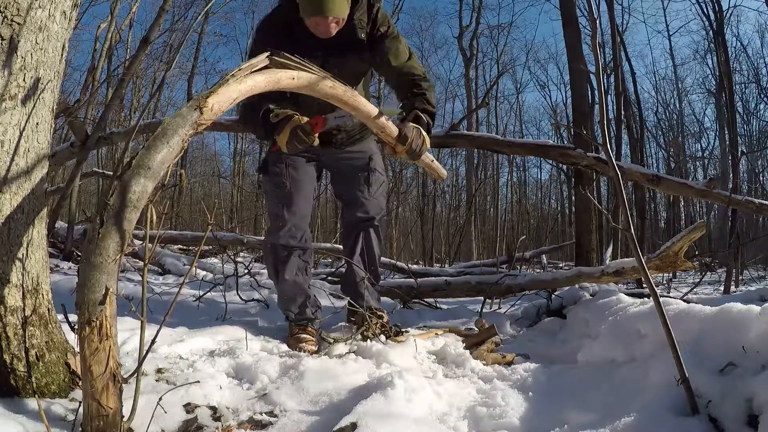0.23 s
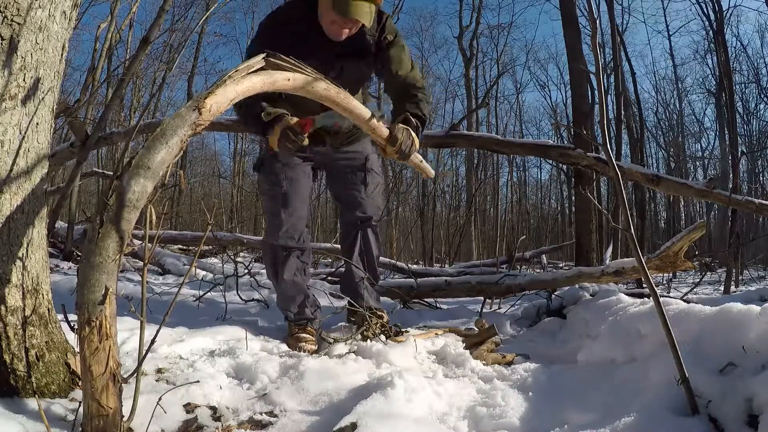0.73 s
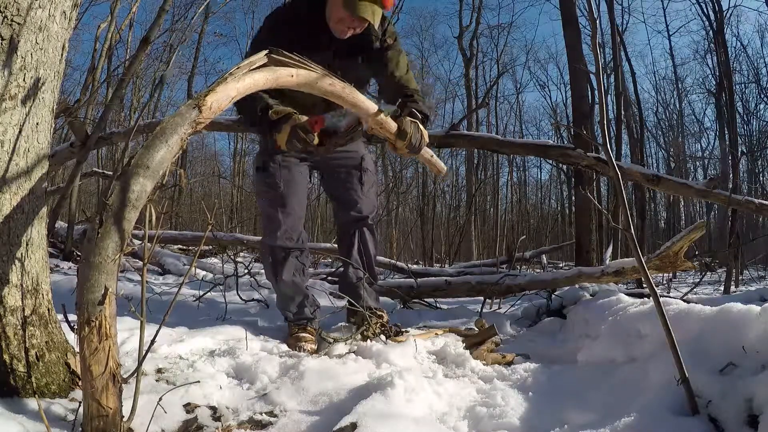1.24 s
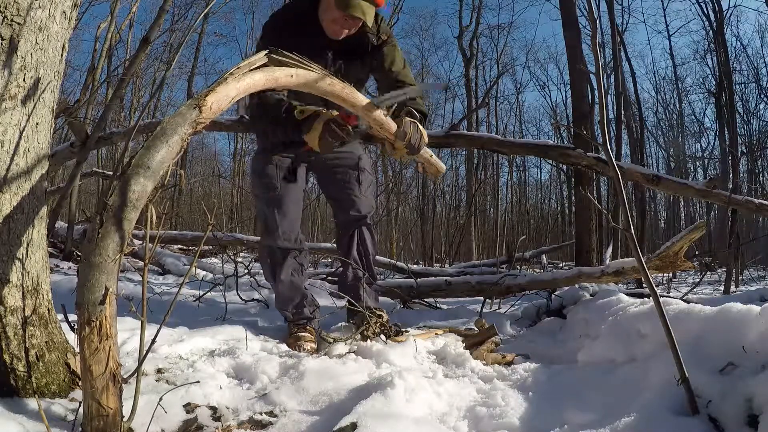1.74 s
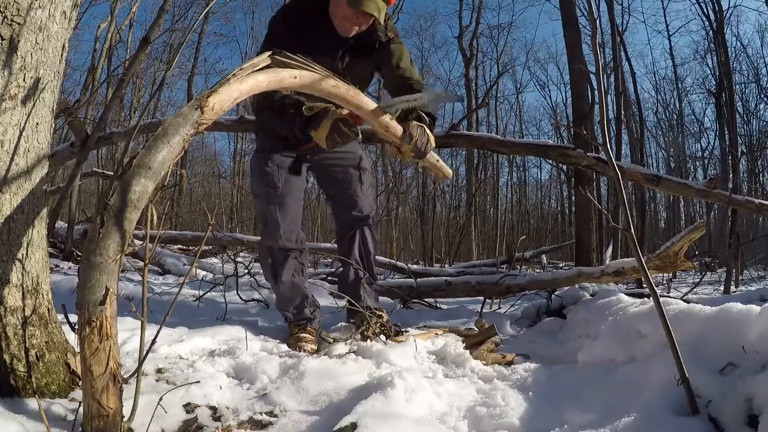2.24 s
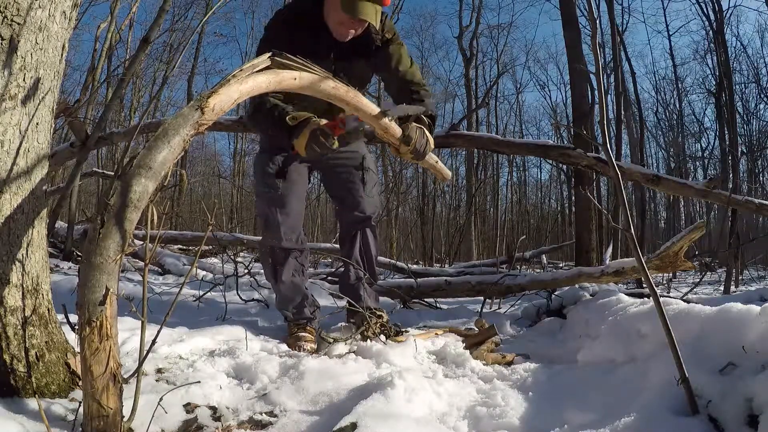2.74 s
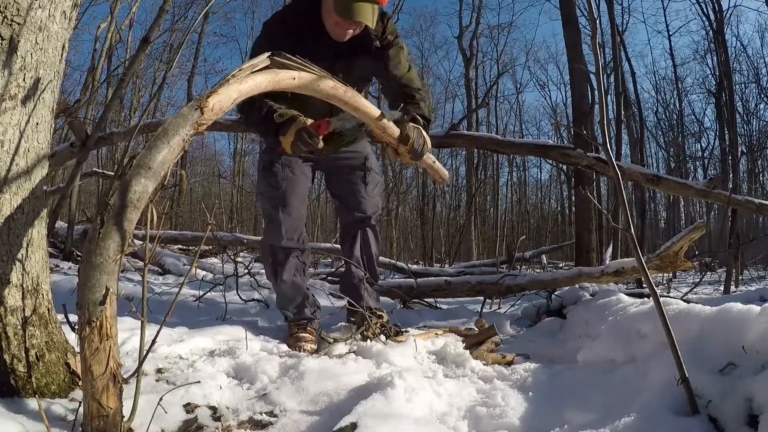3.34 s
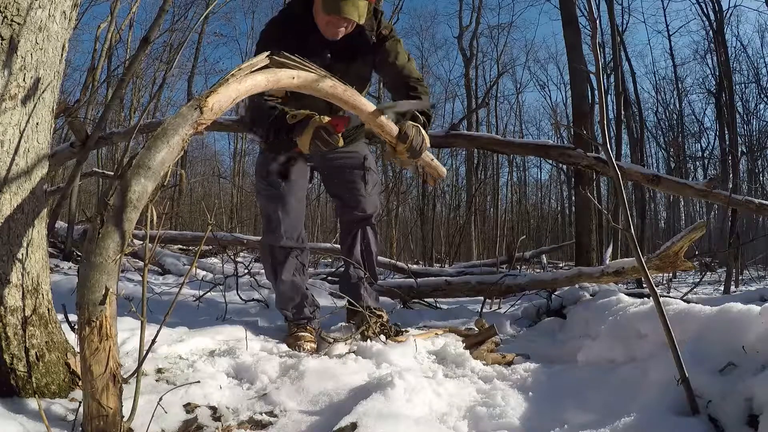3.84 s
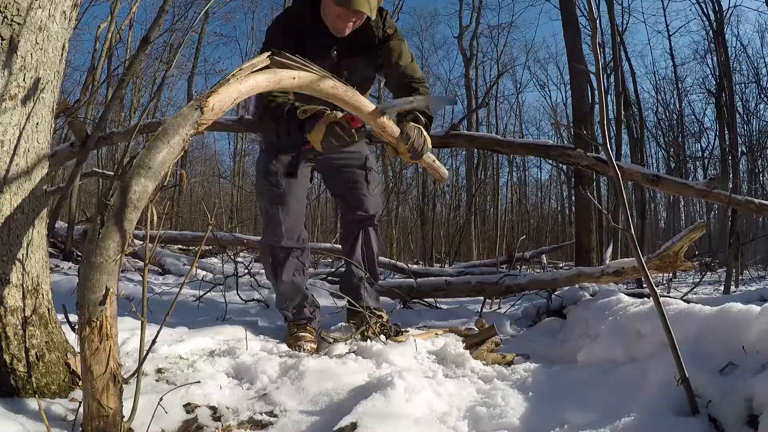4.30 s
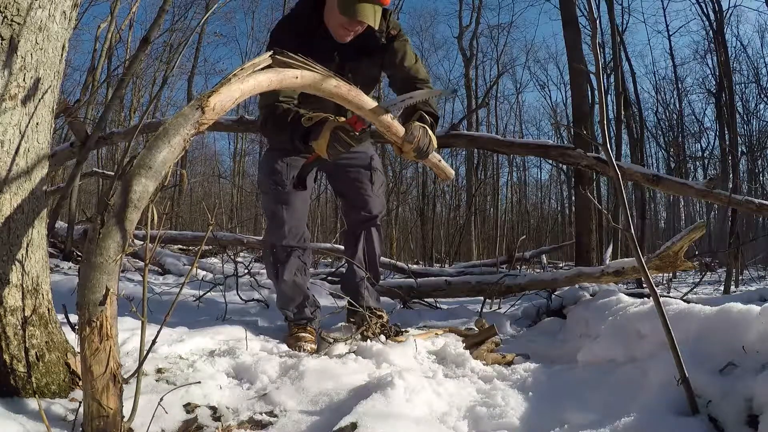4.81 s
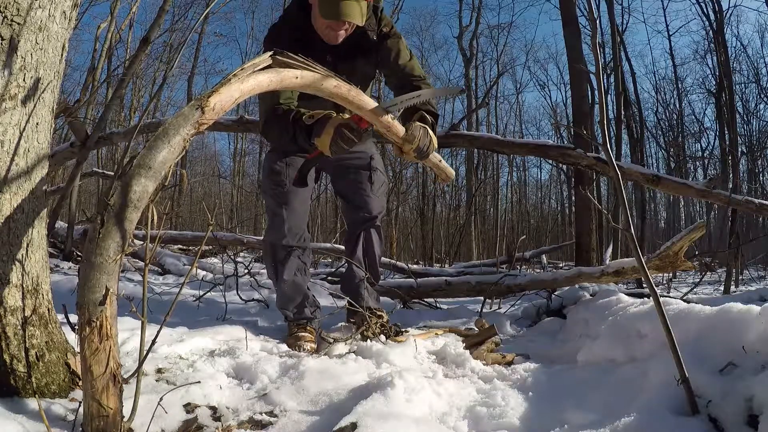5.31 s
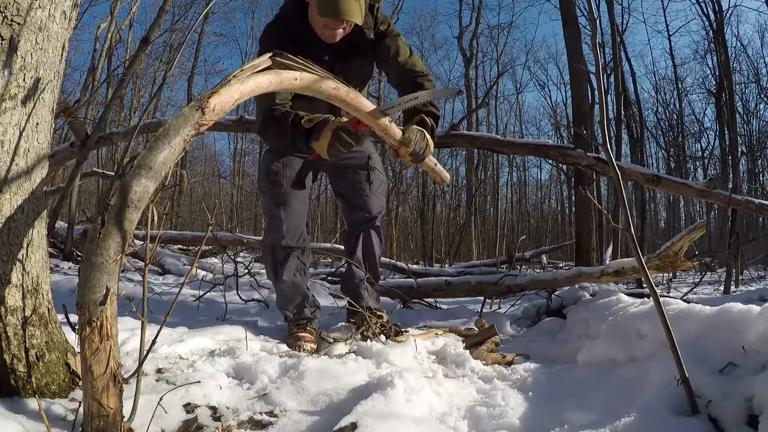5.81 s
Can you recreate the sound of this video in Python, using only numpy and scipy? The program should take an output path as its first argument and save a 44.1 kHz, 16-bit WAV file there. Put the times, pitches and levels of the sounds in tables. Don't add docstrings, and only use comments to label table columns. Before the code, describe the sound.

Brisk sawing of dry wood outdoors, coarse pulls alternating with finer pushes, with small branch shudders, ticks and a few blade squeals late on.

```python
import sys
import numpy as np
from scipy import signal
from scipy.fft import rfft, irfft
from scipy.io import wavfile
from scipy.ndimage import uniform_filter1d

SR = 44100
rng = np.random.default_rng(int(sys.argv[2]) if len(sys.argv) > 2 else 0)


def dump(signal):
    limited = np.clip(np.atleast_2d(signal).T, -1, 1)
    pcm = np.round(limited * 32767).astype(np.int16)
    wavfile.write(sys.argv[1], SR, pcm)


def field_ratio(decibels):
    return 10 ** (np.asarray(decibels, dtype=float) / 20)


N = 267246
T = np.arange(N) / SR


def evened(x):
    return x / np.sqrt(np.mean(x ** 2) + 1e-20)


def levelled(x, size):
    return x / np.sqrt(abs(uniform_filter1d(x ** 2, size)) + 1e-12)


def coloured(x, points, lo_hz=20, hi_hz=20000):
    hz = abs(np.fft.fftfreq(8192, 1 / SR)) + 1
    point_hz, point_db = np.transpose(points)
    edges = np.sqrt((1 + (lo_hz / hz) ** 8) * (1 + (hz / hi_hz) ** 8))
    gain = field_ratio(np.interp(np.log(hz), np.log(point_hz), point_db)) / edges
    log_gain = np.log(np.maximum(gain, 1e-5))
    taps = np.fft.ifft(np.exp(np.conj(signal.hilbert(log_gain)))).real[:4096]
    return evened(signal.oaconvolve(x, taps)[:N])


def resonate(x, hz, width):
    turn = np.exp(2j * np.pi * np.cumsum(hz * np.ones(N)) / SR)
    r = np.exp(-np.pi * width / SR)
    return 2 * (turn * signal.lfilter([1 - r], [1, -r], x / turn)).real


def wander(top_hz):
    low_pass = signal.butter(2, top_hz, fs=SR, output="sos")
    return evened(signal.sosfilt(low_pass, rng.standard_normal(N)))


def clicks(events):
    out = np.zeros(N)
    s, db = np.transpose(events)
    out[np.minimum(np.round(s * SR).astype(int), N - 1)] = field_ratio(db)
    return out


def bumps(events, width_s):
    return sum(field_ratio(db) * np.exp(-.5 * ((T - s) / width_s) ** 2) for s, db in events)


def saw():
    bite, hiss, rumble, shake, index, place = strokes()
    pull = index % 2 == 1
    buzz = tooth_buzz(pull, index, place)
    caught = catches()
    jolts = fibres(buzz, caught, np.where(pull, 1.25, .65))
    scrape = fibres(buzz, caught, np.where(pull, .65, .4))
    rings = sharp_rings(jolts, scrape, pull, index, place)
    flat = [(20, 0), (20000, 0)]
    wood = evened(stroke_colour(jolts, pull, 766, 3560) + 0.79 * coloured(rings, flat, 460, 3150))
    blade = evened(stroke_colour(scrape, pull, 3700, 20000) + .7 * coloured(rings, flat, 3800, 20000))
    tooth_thump = np.where(pull, .6, 3.2) * buzz * ((1 + place) / 2) ** 1.5 * field_ratio(2 * wander(25))
    thump = stroke_colour(scrape, pull, 120, 750) + tooth_thump
    swing = levelled(resonate(evened(caught * bite) + 1.65 * jolts, 75, 16), size=900)
    cut = bite * wood + hiss * field_ratio(1.74 * wander(28)) * blade
    cut = cut + rumble * levelled(thump, size=2500) + shake * swing
    return cut + squeaks() + rasps()


# start_s, length_s, peak_bite_db, lateness of the peak [1 = middle], mid_stroke_teeth_per_s
PUSHES = [(-0.15, 0.21, -24.5, 0.91, 150), (0.335, 0.18, -30.5, 0.98, 175), (0.747, 0.18, -30, 1.42, 165),
          (1.176, 0.16, -28.5, 1.22, 181), (1.581, 0.18, -30.5, 1.21, 157), (2.019, 0.14, -29, 2.02, 166),
          (2.405, 0.2, -32, 1.39, 181), (2.842, 0.17, -30.5, 1.88, 210), (3.274, 0.19, -32, 1.29, 161),
          (3.725, 0.18, -31, 1.15, 215), (4.151, 0.18, -31.5, 1.326, 230), (4.6, 0.23, -32, 1.16, 132),
          (5.065, 0.23, -33, 1.23, 146), (5.532, 0.21, -31, 1.27, 179), (6.004, 0.15, -33.5, 0.95, 180)]
# start_s, length_s, peak_bite_db, lateness of the peak [1 = middle], blade_hiss_db over the bite
PULLS = [(0.069, 0.22, -28, 1.264, -4), (0.525, 0.19, -28, 1.014, -2.5), (0.952, 0.2, -30.5, 1.49, 0.5),
         (1.374, 0.18, -27.5, 1.26, -4.5), (1.763, 0.197, -31.5, 1.5, -3), (2.179, 0.21, -27.5, 1.69, -3.5),
         (2.629, 0.18, -30.5, 1.36, -2.5), (3.075, 0.17, -30.5, 1.29, -2), (3.505, 0.17, -29.5, 1.23, -2),
         (3.922, 0.17, -28.5, 1.3, -2.5), (4.349, 0.2, -30, 1.61, -1.5), (4.873, 0.16, -30, 1.2, -4),
         (5.329, 0.19, -27.5, 1.3, -0.5), (5.774, 0.17, -29, 1.33, 1)]
# middle_s, level_db
SHAKES = [(0.04, -46.5), (0.21, -43), (0.44, -48.5), (0.65, -47), (1.101, -49), (1.28, -54), (1.5, -55),
          (1.9, -44), (2.341, -48), (2.75, -43), (3.189, -39), (3.421, -47.5), (3.62, -42), (4.039, -46),
          (4.501, -42), (4.791, -53), (4.979, -49.5), (5.469, -56), (5.661, -46), (5.9, -46.5)]


def strokes():
    table = np.array(sorted(PUSHES + PULLS))
    index = np.maximum(np.searchsorted(table[:, 0], T) - 1, 0)
    start, length, peak_db, lateness, last = table[index].T
    pull = index % 2 == 1
    pointedness = np.where(pull, 1.57, 1.455) + 11.1 * (length - 0.19)
    done = np.clip((T - start) / length, 0, 1)
    travel = done ** lateness
    speed = abs(np.sin(np.pi * travel))
    bite = field_ratio(peak_db) * speed ** (pointedness * np.where(travel > .5, 0.89, 1))
    stop_s, release_s = 0.004, 0.031
    bite = bite * np.clip((start + length - stop_s - T) / release_s, 0, 1)
    late = np.clip(2.5 * done - .75, -.3, 1.4)
    hiss_db = np.where(pull, last - .4 * (late - .5), -5.5 - 2.5 * (late - .5))
    rumble_db = np.where(pull, -19 + 8 * late, -17.5 + 7.5 * late)
    sing = (bite / field_ratio(peak_db)) ** np.where(pull, 0.3, 0.21)
    return bite, bite * sing * field_ratio(hiss_db), bite * field_ratio(rumble_db), bumps(SHAKES, 0.04), index, 2 * travel - 1


def tooth_buzz(pull, index, place):
    pushing_hz = np.array(PUSHES)[index // 2, -1] * (1.03 - .42 * np.maximum(place + .15, 0) ** 2)
    pulling_hz = 270 * np.sqrt(1 - 0.76 * place ** 2)
    hz = np.where(pull, pulling_hz, pushing_hz) * (1 + wander(40) / 70)
    turn = 2 * np.pi * np.cumsum(hz) / SR
    overtones = sum(np.cos(k * turn) * 1.6 / np.sqrt(k) for k in range(2, 7))
    return np.cos(turn) + ~pull * overtones


# middle_s, level_db over the bite
CATCHES = [(0.169, 3), (0.194, 6), (0.355, 6), (0.406, 5), (0.641, 9), (0.796, 9), (1.057, 5), (1.207, 5),
           (1.258, 4), (1.468, 6), (1.613, 6), (1.689, 5), (1.838, 5), (2.277, 5), (2.703, 7), (2.763, 7),
           (2.892, 8), (3.114, 5), (3.142, 5), (3.384, 6), (3.541, 8), (3.571, 7), (3.753, 8), (3.976, 6),
           (4.253, 7), (4.645, 11), (4.918, 5), (5.418, 4), (5.582, 7), (5.822, 4)]


def catches():
    gap_s, jitter_s, push_misses = .0138, .001, .55
    level_db, spread_db = 4, 1.5
    starts = np.transpose(sorted(PUSHES + PULLS))[0]
    restarts = np.sort(np.r_[np.transpose(CATCHES)[0], np.maximum(starts + .03, 0), N / SR])
    luck = rng.standard_normal((len(restarts), 16, 2))
    missed = rng.random((len(restarts), 16)) < push_misses
    at = restarts[:, None] + np.cumsum(gap_s + jitter_s * luck[..., 0], axis=1)
    pushing = (np.searchsorted(starts, at) - 1) % 2 == 0
    in_time = at < np.r_[restarts[1:], 0][:, None] - gap_s / 2
    kept = in_time & ~(missed & pushing)
    shudder_db = np.minimum(np.interp(at[kept], *np.transpose(SHAKES)) + 43, 0)
    chatter_db = level_db + .55 * shudder_db + spread_db * luck[..., 1][kept]
    return clicks(np.r_[CATCHES, np.c_[at[kept], chatter_db]])


def fibres(teeth, caught, catch):
    t = np.arange(-300, 301) / SR
    burst = signal.oaconvolve(caught, np.exp(-.5 * (t / .0026) ** 2), "same")
    gate = (1 + 0.11 * teeth) * field_ratio(0.63 * wander(280))
    sizes = rng.standard_normal(N) * field_ratio(0.88 * rng.exponential(1, N))
    snaps = sizes * (rng.random(N) < 25000 / SR)
    return evened(snaps) * (gate + catch * burst)


# pitch_hz, level_db per Hz
PULL = [(71, 6.5), (120, -27), (287, -9), (389, -26), (792, -12), (950, -19), (1450, -1.5), (2470, -19.5),
        (2840, -13), (6020, -24), (8160, -16), (9600, -32), (13000, -21.5), (15300, -33)]
# pitch_hz, level_db per Hz
PUSH = [(71, -27), (120, -34), (173, 8), (244, -2.5), (405, 8), (931, -13.5), (1450, 2.5), (1610, -6.5),
        (2520, -13), (2840, -9.5), (3850, -11), (8160, -7), (9600, -16), (15300, -9)]


def stroke_colour(drive, pull, lo_hz, hi_hz):
    pulled = evened(pull * coloured(drive, PULL, lo_hz, hi_hz))
    pushed = evened(~pull * coloured(drive, PUSH, lo_hz, hi_hz))
    return np.where(pull, pulled, pushed)


# pitch_hz, width_hz, level_db
RINGS = [(1350, 51, -52), (1477, 23, -7), (1673, 110, -17.5), (1985, 280, -17.5), (2816, 200, -10),
         (3300, 57, -15.5), (4190, 130, -17.5), (5070, 69, -15.5), (7000, 140, -10.5), (7600, 150, -6.5),
         (8250, 96, -5), (12850, 100, -48)]


def sharp_rings(jolts, scrape, pull, index, place):
    chance = rng.standard_normal((len(PUSHES + PULLS), len(RINGS), 2))
    rings = np.zeros(N)
    for k, (hz, width, db) in enumerate(RINGS):
        pitch = hz * (1 + 0.0254 * (chance[index, k, 0] + place * np.where(pull, 1, -1)))
        swell_db = 2 * chance[index, k, 1] + 3.5 * wander(25)
        drive = jolts if hz < 3800 else scrape
        rings += field_ratio(db + swell_db) * evened(resonate(drive, pitch, width))
    return rings


# start_s, length_s, first_pitch_hz, last_pitch_hz, level_db
SQUEAKS = [
    (.69, .035, 3320, 3300, -56),
    (1.926, .026, 4060, 3850, -38),
    (4.072, .05, 2020, 1970, -52),
]


def squeaks():
    out, waver, rough = np.zeros(N), wander(291), field_ratio(2 * wander(241.8))
    for s, length, first_hz, last_hz, db in SQUEAKS:
        over_db = 2 * (db + 35)
        u = np.clip((T - s) / length, 0, 1)
        hz = (first_hz + (last_hz - first_hz) * u) * (1 + waver / 120)
        turn = 2 * np.pi * np.cumsum(hz) / SR
        overtones = np.sin(2 * turn) + 0.23 * np.sin(3 * turn)
        out += field_ratio(db) * np.sin(np.pi * u) * (np.sin(turn) + field_ratio(over_db) * overtones)
    return out * rough


# start_s, length_s, first_pitch_hz, last_pitch_hz, level_db
RASPS = [(2.328, 0.027, 4040, 4030, -36.5), (2.486, 0.042, 4350, 4090, -40),
         (2.761, 0.036, 3380, 3300, -47), (3.188, 0.026, 5550, 5500, -37), (4.689, .04, 4970, 4180, -42),
         (5.157, 0.052, 3820, 3300, -34.5), (5.163, 0.018, 5260, 4750, -37.5),
         (5.159, 0.041, 1976, 1900, -33.5), (5.625, 0.042, 4746, 4190, -31), (5.628, .035, 7025, 7070, -33),
         (5.639, 0.039, 2918, 2800, -32)]


def rasps():
    out, noise = np.zeros(N), rng.standard_normal(N)
    for s, length, first_hz, last_hz, db in RASPS:
        width = 110 + .2 * (first_hz - last_hz)
        u = np.clip((T - s) / length, 0, 1)
        squeal = evened(resonate(noise, first_hz + (last_hz - first_hz) * u, width))
        out += field_ratio(db) * np.sin(np.pi * u) * squeal
    return out


def trunks(x):
    t = np.arange(SR // 4) / SR
    echoes = rng.choice([-1., 1.], len(t)) * (rng.random(len(t)) < 2000 / SR)
    tail = echoes * field_ratio(-60 * t / 0.017) * (t > .004)
    return signal.oaconvolve(x, tail / np.linalg.norm(tail))[:N]


# start_s, peak_db
TICKS = [
    (0.2973, -34),
    (1.34, -36),
    (1.376, -50),
    (1.5963, -49),
    (2.2, -53),
    (3.704, -78),
    (3.929, -45),
]
# middle_s, level_db
RUSTLE = [(.064, -79), (.317, -65), (.51, -61), (1.76, -62), (2.174, -63), (2.396, -67), (3.04, -60),
          (3.259, -70), (3.496, -54), (5.049, -59), (5.31, -59.5), (5.514, -52.5), (5.751, -64.5),
          (5.985, -66)]
# pitch_hz, level_db per Hz
QUIET = [(18, -28), (30, 2), (53, -40.5), (525, -2), (1460, -5.5), (2410, -15), (2820, -12.5),
         (5880, -16.5), (8280, -16), (13600, -35), (16000, -49)]


def woods():
    still = coloured(rng.standard_normal(N) * field_ratio(2 * wander(66)), QUIET, 270, 18000)
    moving = coloured(still, [(20, 3), (20000, 2)], 195, 6900) * bumps(RUSTLE, 0.099)
    rustle = field_ratio(-63) * still + field_ratio(-1) * moving
    t = np.arange(300) / SR
    tick_shape = rng.standard_normal(len(t)) * np.exp(-t / 0.0013)
    ticks = signal.oaconvolve(clicks(TICKS), tick_shape)[:N]
    hum = field_ratio(-58.5) * coloured(rng.standard_normal(N), QUIET, 52, 110)
    pressure = signal.lfilter(*signal.butter(2, 12, fs=SR), wander(4.66))
    air = field_ratio(-42.5) * evened(signal.lfilter([1], [1, -.9995], pressure))
    return rustle + 0.35 * ticks + hum + air


def scene():
    cut = saw()
    return (cut + field_ratio(-14) * trunks(cut) + woods())[None]


# middle_s, share of the nearby power a tone must reach
STARVED = [
    (.398, .4),
    (1.677, .4),
    (2.096, .45),
    (2.955, .4),
    (3.578, .8),
    (4.437, .5),
    (4.488, .45),
    (5.441, .45),
]


def starve(x):
    window, out = signal.windows.tukey(1300, .6), x.copy()
    for s, share in STARVED:
        at = round(s * SR) - 1024
        piece = x[at:at + 2048]
        lines = rfft(piece)
        power = abs(rfft(piece * np.hanning(2048))) ** 2
        lost = uniform_filter1d(power, size=9) < share * uniform_filter1d(power, size=150)
        lost[:30] = False
        out[at + 374:at + 1674] -= window * irfft(lines * lost)[374:1674]
    return out


def top_cut(x):
    return signal.sosfilt(signal.butter(12, 16110, fs=SR, output="sos"), x)


def record(dry):
    heard = dry[0] + field_ratio(-66) * rng.standard_normal(N)
    heard = signal.lfilter(*signal.butter(2, 14000, fs=SR), heard)
    edge = signal.firwin(401, 15330, window=("kaiser", 9), fs=SR)
    limited = signal.oaconvolve(heard, edge, "same")
    return top_cut(starve(limited)[None])


dry = scene()
out = record(dry)
dump(out)
```